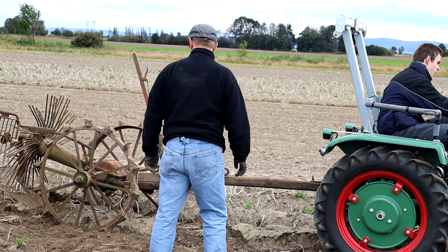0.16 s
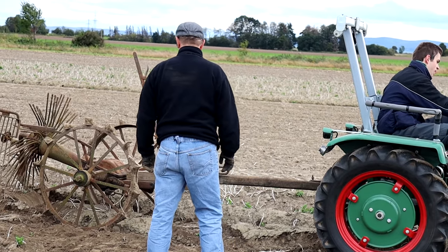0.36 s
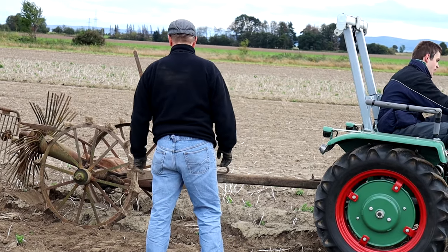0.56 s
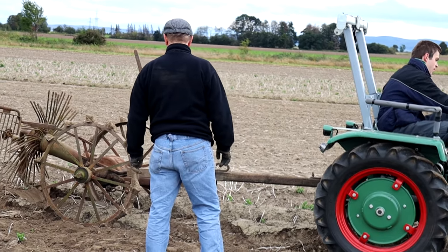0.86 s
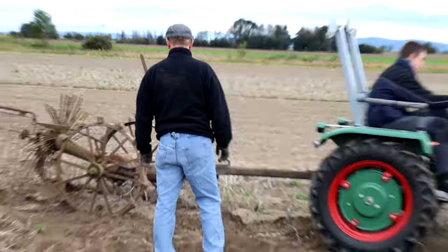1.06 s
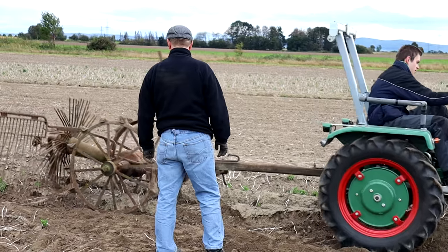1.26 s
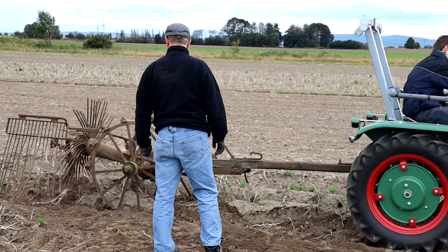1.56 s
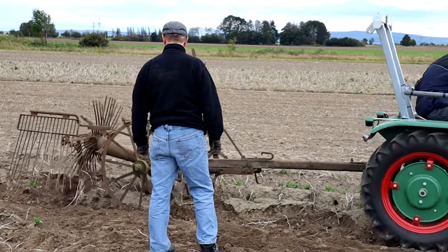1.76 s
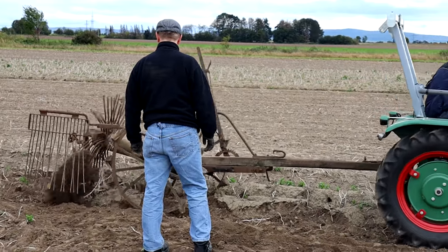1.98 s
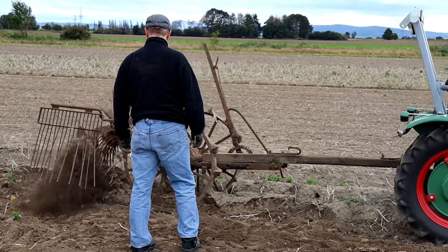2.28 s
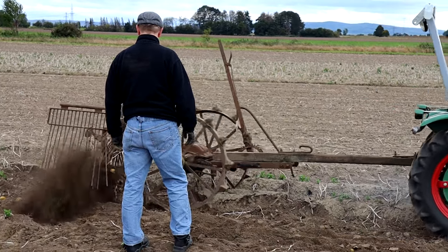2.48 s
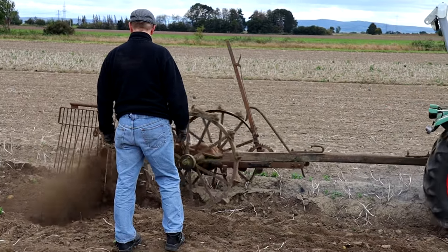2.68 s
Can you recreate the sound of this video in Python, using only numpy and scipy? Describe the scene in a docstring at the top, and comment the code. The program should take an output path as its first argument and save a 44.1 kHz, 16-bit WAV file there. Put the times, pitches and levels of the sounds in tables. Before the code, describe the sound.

Wind noise dominates, buffeting the microphone in uneven gusts with sharp popping jolts; beneath it a small two-cylinder diesel tractor clatters continuously a few metres away in an open field, and brighter wind crackles come later.

```python
"""Wind is heard first, buffeting a microphone in gusts and eddies, with sharp pops soon after.
Under it, from the start, a small two-cylinder diesel tractor clatters and hisses once a firing
as it pulls a digger across an open field a few metres away. Later the wind crackles brightly.
Wind and engine are shaped noise, pops are short swings of a wave, crackles are short filtered noise.
The recorder widens its two close ports: their sum is dull, their difference carries the treble."""
import sys
import numpy as np
from scipy import signal
from scipy.fft import rfft, irfft
from scipy.io import wavfile
from scipy.ndimage import uniform_filter1d, minimum_filter1d

SR = 44100
rng = np.random.default_rng(int(sys.argv[2]) if len(sys.argv) > 2 else 0)


def wav_out(sig):
    """Save sig, one row per channel (or a flat mono array), as 16-bit PCM at SR to the path in sys.argv[1]."""
    wavfile.write(sys.argv[1], SR, np.round(np.clip(np.atleast_2d(sig).T, -1, 1) * 32767).astype(np.int16))


N = 124803  # samples, 2.83 s


def undb(db):
    """Turn decibels into a plain factor."""
    return 10 ** (np.asarray(db) / 20)


def curve(table, col=1):
    """A table column as a value per sample, in straight lines between the rows."""
    rows = np.array(table, float)
    return np.interp(np.arange(N) / SR, rows[:, 0], rows[:, col])


def over_hz(table, col=1):
    """A table column as a value per spectrum bin, in straight lines over log frequency."""
    rows = np.array(table, float)
    return np.interp(np.log(np.fft.rfftfreq(N, 1 / SR) + 1), np.log(rows[:, 0]), rows[:, col])


def unit(x):
    """Scale a signal to an average (rms) level of 1."""
    return x / np.sqrt(np.mean(x ** 2))


def walk(rate_hz):
    """Random levels held 1 / rate s and smoothed twice; spread 1."""
    hold = int(SR / rate_hz)
    steps = np.repeat(rng.standard_normal(N // hold + 1), hold)
    smooth = uniform_filter1d(uniform_filter1d(steps, hold), hold)[:N]
    return smooth / smooth.std()


def flutter_walk(rate_hz):
    """A quick walk with its slow drift taken away."""
    quick = walk(rate_hz)
    return unit(quick - uniform_filter1d(quick, int(3 * SR / rate_hz)))


def octaves(spectrum):
    """Overlapping octave bands around 500 Hz, with their octave number."""
    octave = np.log2((np.fft.rfftfreq(N, 1 / SR) + 1) / 500).clip(-3, 4)
    return [(k, irfft(spectrum * np.clip(1 - abs(octave - k), 0, 1), N)) for k in range(-3, 5)]


def turbulence(hits, eddy_db):
    """Turbulent air: steady hiss plus scattered eddies of uneven size, as a spectrum."""
    eddies = unit(hits * rng.choice([-1, 1], N))
    return rfft(rng.standard_normal(N) + undb(eddy_db) * eddies)


# Wind gusts before flutter and flicker: t/s, level/dB, level of the ports' difference against it/dB
WIND_GUSTS = [(0.0, -15.5, -16), (0.086, -21, -18), (0.104, -19, -4), (0.112, -36, -14), (0.124, -19, -15),
              (0.208, -35, -19), (0.292, -15.5, -20), (0.322, -26, -13), (0.402, -15.5, -19),
              (0.432, -46.5, -18), (0.448, -9, -12), (0.48, -30, -19), (0.53, -21, -16), (0.562, -8, -14),
              (0.58, -14, -16), (0.604, -5.5, -14.5), (0.636, -13.5, -14), (0.674, -27, -22),
              (0.7, -19, -14), (0.71, -12.5, -16), (0.728, -17, -13.5), (0.858, -16, -14),
              (0.864, -20, -26), (0.888, -15.5, -20), (0.94, -12, -15), (0.958, -23, -17),
              (0.968, -22, -19), (0.996, -27, -14), (1.024, -16, -14), (1.032, -34.5, -13),
              (1.064, -12.5, -14), (1.122, -31, -22), (1.186, -18.5, -18), (1.236, -24.5, -18),
              (1.264, -7.5, -15), (1.284, -16.5, -16), (1.312, -20, -13), (1.33, -20.5, -14),
              (1.392, -23.5, -24), (1.398, -56, -14), (1.42, -24.5, -10), (1.44, -17, -17.5),
              (1.56, -13.5, -15.5), (1.566, -18.5, -14), (1.64, -19.5, -16), (1.652, -13, -16),
              (1.73, -19.5, -11), (1.742, -41, -22), (1.752, -16, -15), (1.83, -15.5, -15),
              (1.946, -27.5, -14), (1.962, -12, -17), (2.0, -26, -15), (2.012, -14, -18), (2.062, -29, -15),
              (2.074, -20.5, -13), (2.098, -25.5, -21), (2.108, -19, -13), (2.224, -20, -14.5),
              (2.264, -14, -15), (2.31, -17, -17), (2.33, -30, -12), (2.338, -18, -14), (2.442, -17, -13.5),
              (2.472, -11, -19), (2.492, -22, -12), (2.51, -10, -21), (2.522, -19.5, -14),
              (2.554, -22, -13), (2.658, -24, -14), (2.67, -26.5, -12), (2.764, -19, -19),
              (2.778, -29, -12), (2.83, -22, -10)]
# Extra slope of the wind's treble above 500 Hz: t/s, level per octave/dB
WIND_TILT = [(0, -3.5), (.3, -3), (.59, 0), (.9, -3), (1.1, -2.8), (1.28, 0.8), (1.5, -0.5), (1.7, -0.5),
             (2, -1.8), (2.27, 2.5), (2.38, 1.5), (2.5, 2), (2.6, 1.6), (2.83, 0.4)]
# Wind colour in the ports' sum, only the shape counts: f/Hz, level/dB
WIND_SUM_COLOUR = [(20, -28.5), (60, -12), (160, -2), (360, 1.5), (600, -0.5), (1000, -4), (1600, -12),
                   (2500, -26.5), (4000, -36), (8000, -100.5)]
# Wind colour in the ports' difference, only the shape counts: f/Hz, level/dB
WIND_DIFF_COLOUR = [(100, -58.5), (250, -34), (400, -8.5), (650, -3), (1050, 1), (1700, -2), (2600, -13),
                    (4000, -18), (7000, -32.5), (12000, -72)]
WIND_LIKENESS = 0.1  # how alike the ports' sum and difference are, 0-1
EDDIES_PER_S, EDDY_SPREAD_DB = 450, 3
EDDY_DB, DIFF_EDDY_DB = 3, 9  # eddies over the hiss, in the sum and in the difference
FLUTTER_DB, FLICKER_DB = 1.5, 1.63  # all bands together, each band alone
TREBLE_PER_GUST_DB = -0.0313  # dB per octave above 500 Hz, for each dB of swing
BASS_STEADY = 0.21  # share of the swing that the bass loses per octave below 500 Hz


def wind():
    """Octave bands of turbulence ride the gusts, flutter together and flicker alone; bass swings least."""
    gust_db = curve(WIND_GUSTS)
    eddy_size = undb(EDDY_SPREAD_DB * rng.exponential(size=N).clip(0, 2.5))
    # the eddies strike the sum and the difference at the same moments
    hits = (rng.random(N) < EDDIES_PER_S / SR) * eddy_size
    first, second = turbulence(hits, EDDY_DB), turbulence(hits, DIFF_EDDY_DB)
    # 1j turns the shared part by a quarter cycle
    mixed = 1j * WIND_LIKENESS * first + np.sqrt(1 - WIND_LIKENESS ** 2) * second
    pair = np.array([first * undb(over_hz(WIND_SUM_COLOUR)), mixed * undb(over_hz(WIND_DIFF_COLOUR))])
    pair /= np.sqrt(2 * np.sum(abs(pair) ** 2, axis=1, keepdims=True)) / N  # rms level 1 each

    flutter_db = FLUTTER_DB * flutter_walk(130)
    swing_db = gust_db - gust_db.mean() + flutter_db
    treble_slope_db = TREBLE_PER_GUST_DB * swing_db + curve(WIND_TILT)
    bass_slope_db = BASS_STEADY * swing_db
    out = np.zeros((2, N))
    for k, band in octaves(pair):
        slope_db = treble_slope_db if k > 0 else bass_slope_db
        out += band * undb(k * slope_db + FLICKER_DB * flutter_walk(29.86))
    diff_db = np.array([np.zeros(N), curve(WIND_GUSTS, col=2)])
    return out * undb(gust_db + flutter_db + diff_db)


# Engine speed: t/s, firings per second/Hz
FIRING_RATE = [(0.0, 25.29), (0.4, 24.98), (0.81, 27.52), (1.21, 27.93), (1.62, 25.1), (2.02, 29.21),
               (2.43, 29.6), (2.83, 31.71)]
# Engine load, added to its level: t/s, level/dB
ENGINE_LOAD = [(0, 1), (.5, 3.5), (1, 1), (1.5, 0.5), (2.2, 0), (2.83, -1.5)]
# Engine colour in the ports' sum, before ENGINE_DB is added: f/Hz, level/dB
ENGINE_SUM_COLOUR = [(60, -40), (150, -26.5), (500, -25.5), (1200, -32), (1900, -37.5), (2600, -41),
                     (3200, -48), (4200, -49.5), (5000, -56), (6600, -57.5), (7600, -63.5), (10000, -71),
                     (16000, -110)]
# Engine colour in the ports' difference, before ENGINE_DB is added: f/Hz, level/dB
ENGINE_DIFF_COLOUR = [(200, -65.5), (500, -53.5), (1000, -51.5), (1950, -46.5), (2200, -41), (2900, -43.5),
                      (4200, -47), (5200, -52.5), (7000, -51), (8500, -54), (10500, -45), (13000, -63),
                      (16000, -55)]
# Rings of the engine casing, a minus lift is a dip: f/Hz, width/Hz, lift/dB
CASING_RINGS = [(2125, 50, 5.5), (2608, 150, 4), (3310, 150, 3), (7670, 260, -11), (10200, 580, -7)]
# Engine in the difference against the sum: f/Hz, phase/rad, likeness/0-1
PORT_LIKENESS = [(1500, -0.69, .3), (2100, 0.1, 0.96), (2500, -0.62, 0.7), (3600, -1.5, .75),
                 (4500, -1.63, .8), (9000, -1.7, .7)]
ENGINE_DB = 14
FIRST_TURN = -0.24  # firing phase at the start, in firings
PUFF_LEAD = 0.37  # how early a puff begins before its peak, in firings
PUFF_RISE, PUFF_FALL = 0.096, 0.36  # in firings
PUFF_DEPTH_DB, WEAK_DB, SCATTER_DB = 6, 0.27, .5
LOW_PUFF_SHARE = 0.4  # the bands up to 1 kHz throb less than the clatter
PATCHY_DB = 0.8  # each octave band wavers in level on its own


def engine():
    """Each firing opens a puff of clatter over the rumble; every second one is a little weaker."""
    turns = FIRST_TURN + PUFF_LEAD + 1 + np.cumsum(curve(FIRING_RATE)) / SR
    count = turns.astype(int)
    late = turns % 1 - PUFF_LEAD  # firings since the puff's peak
    size_db = WEAK_DB * (count % 2) + SCATTER_DB * rng.standard_normal(200)[count]
    shape = np.exp(-(late / np.where(late < 0, PUFF_RISE, PUFF_FALL)) ** 2)
    puff_db = uniform_filter1d(size_db, size=100) + PUFF_DEPTH_DB * (shape - .5)

    near, spread = rfft(rng.standard_normal((2, N)))
    hz = np.fft.rfftfreq(N, 1 / SR)
    rings_db = sum(db / (1 + (2 * (hz - f) / width) ** 2) for f, width, db in CASING_RINGS)
    like = np.clip(over_hz(PORT_LIKENESS, col=2), 0, 1)
    shared = like * near * np.exp(1j * over_hz(PORT_LIKENESS))
    diff = shared + np.sqrt(1 - like ** 2) * spread
    pair = np.array([near * undb(over_hz(ENGINE_SUM_COLOUR)), diff * undb(over_hz(ENGINE_DIFF_COLOUR))])
    pair = pair * undb(rings_db + ENGINE_DB)

    out = np.zeros((2, N))
    for k, band in octaves(pair):
        share = 1 if k > 1 else LOW_PUFF_SHARE
        out += band * undb(puff_db * share + PATCHY_DB * flutter_walk(30.02))
    return undb(curve(ENGINE_LOAD)) * out


# One deep buffet of the wind: t/s, peak level/dB, f/Hz
DEEP_THUD = (1.682, -24, 63)
# Sharp pops of the wind: t/s, peak level/dB, f/Hz
WIND_POPS = [(0.1033, -1, 676), (0.1332, -9.5, 625), (0.1641, -8.5, 614), (0.3756, -7.5, 800),
             (0.449, -14.5, 527), (0.5121, -6.6, 473), (0.5575, -6, 565), (0.5972, 4, 780),
             (0.696, -5.5, 634), (0.7101, 0, 750), (0.7528, -2, 580), (0.7678, -5, 610), (0.7856, -4, 596),
             (0.8074, 2, 530), (0.939, -23, 640), (0.9687, -4, 560), (1.0229, -6, 540), (1.0782, -8, 760),
             (1.2327, -7.0, 750), (1.2433, -6.5, 620), (1.2609, 1, 570), (1.324, -3.4, 710),
             (1.3415, -6.5, 540), (1.368, -6.5, 550), (1.3899, -4.5, 550), (1.541, -7, 620),
             (1.5588, 3, 560), (1.6081, -2, 556), (1.68, -11, 770), (1.6893, -0.5, 600),
             (1.7079, -8.5, 570), (1.7275, -9, 560), (1.7866, -3, 750), (1.8386, -2.5, 510),
             (1.8485, -8.5, 770), (1.869, -9, 970), (1.961, -2, 710), (2.077, -2, 624), (2.1086, -3.5, 850),
             (2.1723, -4, 1140), (2.2376, -12, 700), (2.2547, -1.5, 1330), (2.3055, 3, 776),
             (2.3382, -0.5, 655), (2.3604, -5.2, 754), (2.3833, 1, 690), (2.5139, 4, 1140),
             (2.5315, -13, 840), (2.5631, -6.0, 690), (2.6165, -7, 850), (2.6255, -13, 690),
             (2.7019, -6.5, 790)]
POP_RISE, POP_CYCLES = 0.29, 0.61  # rise and fall, in cycles of the pop's pitch
POP_DIFF_PITCH, POP_DIFF_DB = 1.6, -20.5  # the ports' difference against their sum


def pops():
    """Short pressure jolts that rise fast and swing out, higher in the ports' difference."""
    out, t = np.zeros((2, N + 4000)), np.arange(-2000, 2000) / SR
    events = list(WIND_POPS) + [DEEP_THUD]
    for (s, db, hz), sign in zip(events, rng.choice([-1, 1], len(events))):
        turns = t * hz * np.array([[1], [POP_DIFF_PITCH]])
        swell = np.exp(-(turns / np.where(turns < 0, POP_RISE, POP_CYCLES)) ** 2)
        jolt = np.cos(2 * np.pi * turns) * swell
        start = int(s * SR)
        out[:, start:start + 4000] += sign * undb(db + np.array([[0], [POP_DIFF_DB]])) * jolt
    return out[:, 2000:N + 2000]  # puts each peak at its listed time


# Bright crackles of the wind on the microphone: t/s, peak level/dB, f/Hz, difference against the sum/dB
WIND_CRACKLES = [(1.666, -16.5, 2300, 3), (1.688, -15.5, 2180, 5), (1.78, -14, 2000, 2),
                 (2.254, -12, 1700, -1), (2.272, -14.5, 2400, 2), (2.3, -26, 2220, -4),
                 (2.404, -24.5, 3500, -9), (2.454, -11.5, 2600, 2), (2.472, -11, 2200, 1.5),
                 (2.5096, -8.5, 1710, 1), (2.5155, -5.5, 1500, -5)]
CRACKLE_WIDTH, CRACKLE_TOP = 1.6, 1.16  # band edges as ratios below and above the listed frequency
CRACKLE_T60_S = 0.0088  # time for the noise to fade by 60 dB


def crackles():
    """Each wind crackle is a short click of fading noise, nearly an octave wide, with its top softened."""
    out, t = np.zeros((2, N + 2000)), np.arange(2000) / SR
    chance = rng.standard_normal((len(WIND_CRACKLES), 2, 2000))
    soften = signal.butter(4, 6500, fs=SR, output="sos")
    for (s, db, hz, diff_db), noise in zip(WIND_CRACKLES, chance):
        band = signal.butter(2, [hz / CRACKLE_WIDTH, hz * CRACKLE_TOP], "band", fs=SR, output="sos")
        crackle = signal.sosfilt(band, noise * undb(-60 * t / CRACKLE_T60_S))
        crackle = signal.sosfilt(soften, crackle)
        crackle /= abs(crackle).max(axis=1, keepdims=True)
        start = int(s * SR)
        out[:, start:start + 2000] += crackle * undb(db + np.array([[0], [diff_db]]))
    return out[:, :N]


def scene():
    """Add the sources as sum and difference of the ports, then turn these into left and right."""
    both, diff = wind() + engine() + pops() + crackles()
    return np.array([both + diff, both - diff])


LIMIT_LEVEL = 0.92  # of full scale
LOW_CUT_HZ, DIFF_LOW_CUT_HZ, TOP_HZ = 130, 430, 14300


def record(dry):
    """A quick limiter holds the loudest peaks; the bass is cut, most in the difference; the top is cut."""
    peak = -minimum_filter1d(-abs(dry).max(axis=0), size=131)  # the highest level nearby
    gain = uniform_filter1d(LIMIT_LEVEL / np.maximum(peak, LIMIT_LEVEL), size=131)
    left, right = dry * gain
    low_cut = signal.butter(1, LOW_CUT_HZ, "high", fs=SR, output="sos")
    diff_low_cut = signal.butter(4, DIFF_LOW_CUT_HZ, "high", fs=SR, output="sos")
    both = signal.sosfilt(low_cut, left + right) / 2
    diff = signal.sosfilt(diff_low_cut, left - right) / 2
    pair = np.clip([both + diff, both - diff], -1, 1)
    return signal.sosfilt(signal.ellip(8, .2, 70, TOP_HZ, fs=SR, output="sos"), pair)


dry = scene()
out = record(dry)
wav_out(out)
```